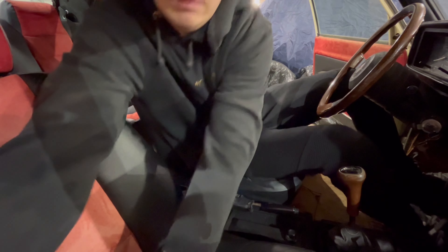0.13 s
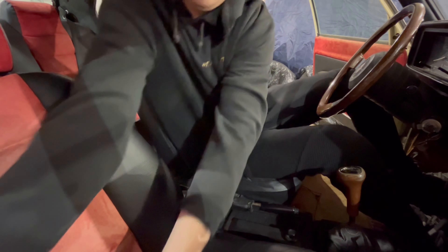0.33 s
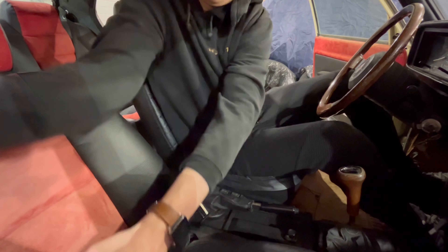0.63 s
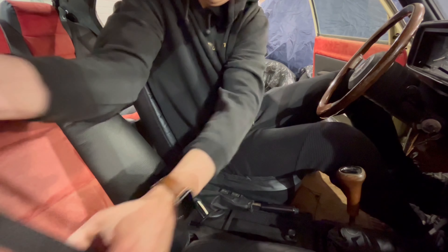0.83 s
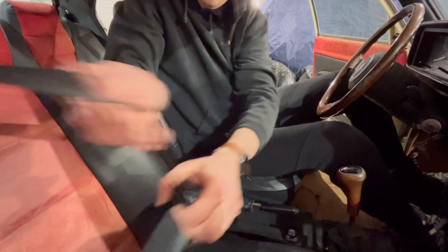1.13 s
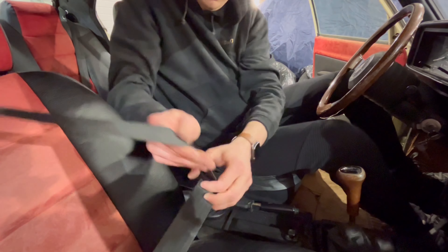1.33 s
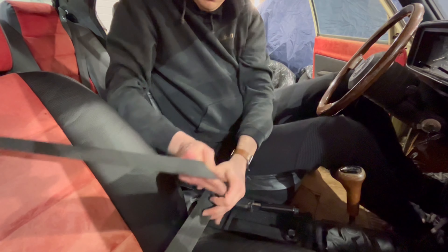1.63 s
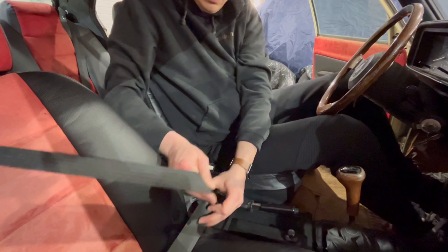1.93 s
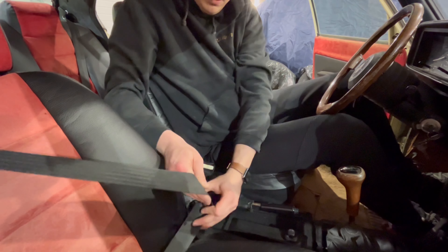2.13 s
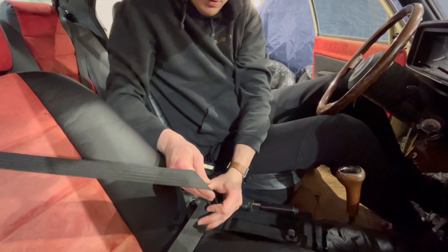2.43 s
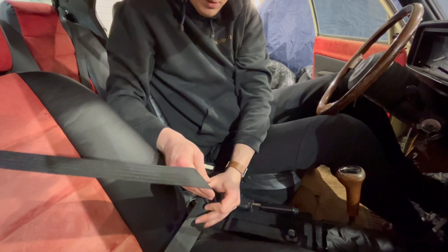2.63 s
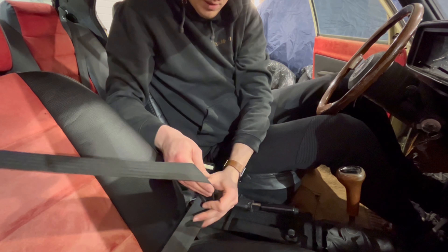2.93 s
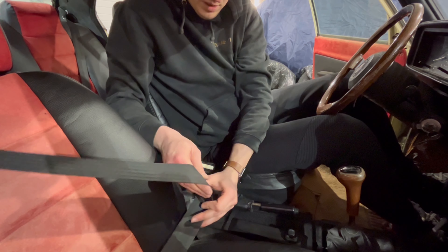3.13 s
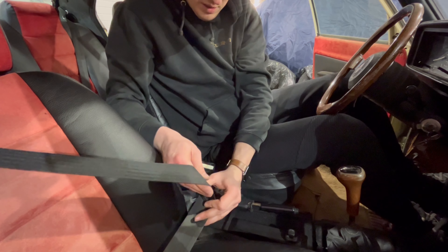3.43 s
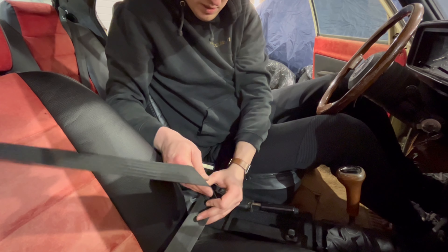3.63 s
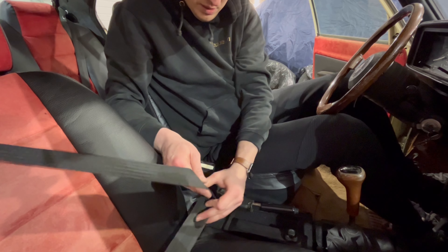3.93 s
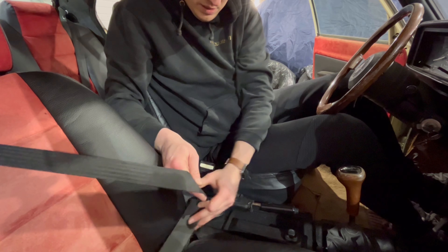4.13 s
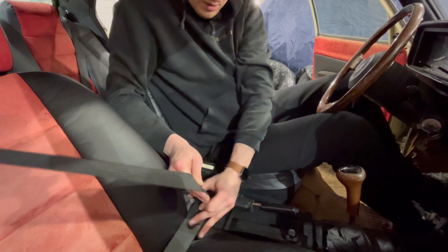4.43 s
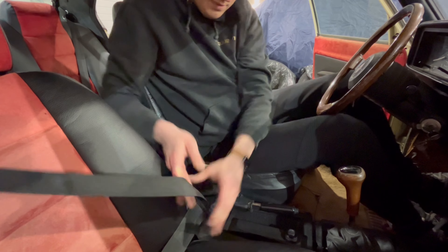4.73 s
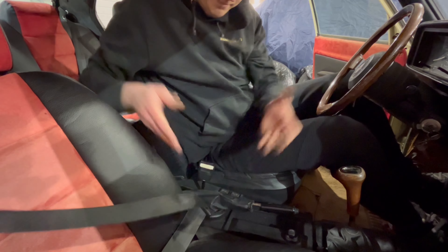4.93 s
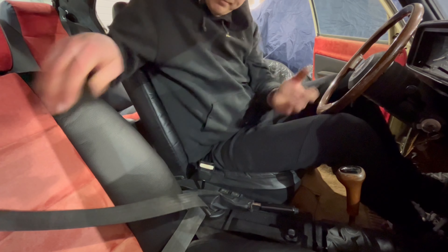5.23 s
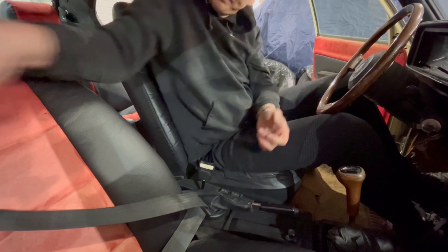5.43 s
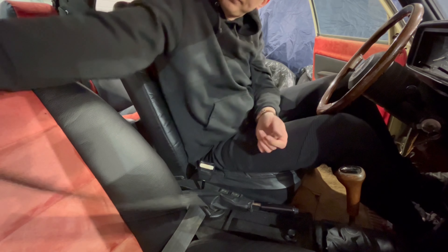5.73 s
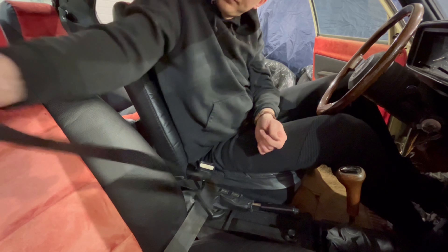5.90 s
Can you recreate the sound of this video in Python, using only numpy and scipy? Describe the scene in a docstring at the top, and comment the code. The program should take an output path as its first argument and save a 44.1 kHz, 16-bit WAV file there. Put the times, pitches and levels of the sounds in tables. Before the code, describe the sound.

A seat belt slides out with a dry fabric rasp and sleeve rustle, then stops. Hands fumble the tongue against the buckle: several isolated hard clicks, faint rattles and dull thumps, then a dense flurry and a crisp, loud snap. It goes nearly silent before webbing swishes again with small ticks. The microphone is near, in a small padded car cabin with a very short tail and faint hiss.

```python
"""A seat belt is drawn out inside a parked car: friction noise of webbing over guide and sleeve.
Hands fumble the metal tongue against the buckle, noise-burst impacts ringing decaying modes, until
the latch snaps shut. Pushes thump the seat and ring the low cabin modes; a short tail follows the clacks.
A steady hiss lies beneath. A two-port microphone sits close by, its ports differing in level and phase."""
import sys
import numpy as np
from scipy import signal
from scipy.fft import rfft, irfft
from scipy.io import wavfile
from scipy.ndimage import uniform_filter1d

SR = 44100
rng = np.random.default_rng(int(sys.argv[2]) if len(sys.argv) > 2 else 0)


def waveform_to_disk(signal):
    """Save audio, clipped to [-1, 1], as 16-bit WAV at the path in sys.argv[1]."""
    frames = np.transpose(np.atleast_2d(signal))
    scaled = np.clip(frames, -1, 1) * 32767
    samples = np.round(scaled).astype(np.int16)
    wavfile.write(sys.argv[1], SR, samples)


N = 267510

# The belt drawn out, then let go again, one curve each: (time [s], level of the sliding webbing [dB])
SLIDE = [
    [(0.0, -50.5), (0.52, -48), (0.65, -52), (0.9, -40), (0.97, -42.5), (1.125, -37), (1.21, -45.5),
     (1.45, -44.5), (1.606, -38.5), (1.625, -49), (1.69, -57.5), (1.82, -77.5)],
    [(5.49, -65.5), (5.515, -48), (5.57, -56), (5.73, -67.5), (5.765, -56), (5.835, -40.5), (5.885, -38),
     (5.93, -54.5), (6.035, -62.5), (6.043, -39.5), (6.07, -30)],
]
# The tongue knocking on buckle and trim: (time [s], rattle length [s], nominal peak [dB],
# crack [dB], crack brightness [dB per octave], hollow knock [dB], favoured ring [Hz], left-right [dB])
CLACKS = [ (1.02, .004, -36, 5.5, -1, 3, 1700, 6), (1.603, 0.0052, -31, 0, 4.5, 4, 1700, 5.5),
          (1.629, 0.0062, -27.5, 9, -0.5, 14, 2100, 5.5), (1.926, 0.0072, -25, 3, -3.5, -23, 1090, 4.5),
          (1.953, 0.00826, -32.5, -5, -4.5, 22, 953, 2), (2.036, 0.0143, -40.5, -4.5, 1, 12, 1070, -4.5),
          (2.059, 0.01036, -17.5, 2.5, 0, 9.5, 1500, 4), (2.166, 0.00714, -35.5, -0.5, 0, 13, 1600, 3),
          (2.428, 0.0288, -43.5, -9.5, -0.5, 10, 1150, 0.5),
          (2.477, 0.00548, -14.5, -3, -1.32, -0.5, 1400, 2), (2.573, 0.0134, -45.5, -6, 13, -13, 1320, 1.5),
          (2.679, 0.00617, -37.5, -6, -16, 12, 1150, 1), (2.929, 0.00828, -15, -3, 3, -4.5, 1200, 1.5),
          (3.44, 0.0099, -33, -3.5, -2.15, 3.5, 1680, 3), (3.644, 0.00706, -32, -7, 2.5, 12.5, 950, 1),
          (3.917, 0.0117, -34, -8.5, -1, 7.5, 1580, -2.5), (3.961, 0.0036, -22.5, -0.5, -2.5, -6, 1780, 4),
          (3.971, 0.0146, -37, 2, -6, 5.5, 1680, 11.5), (4.07, 0.0105, -34, 1, -8, -2, 1640, 0),
          (4.121, 0.0069, -32.5, -3, 3.5, -3, 1650, -0.5), (4.138, 0.00583, -29.5, -1, -1, 14.5, 1660, 8),
          (4.155, .006, -32, 1, 7.5, -12, 1490, -6), (4.205, 0.0093, -40.5, 6.5, 8, -2.5, 1210, 7.5),
          (4.256, 0.0064, -15, -5.5, 7.5, 8.5, 1000, -1.5), (4.265, 0.01, -20, -3.5, 0, 2, 1044, 13.5),
          (4.274, .008, -24.5, 11.5, -0.5, 0.5, 932, -4), (4.352, .006, -9, 12, 8, -23, 1500, 0),
          (4.356, .005, -8, 2, 1, -26.5, 1160, 0), (4.482, 0.0124, -40, 2.5, 5.5, 11.5, 929, 6),
          (4.558, 0.0059, -46, 0, 6.5, 18, 1560, 1), (4.854, 0.0078, -46, 0.5, 4, 12.5, 1693, 2.5),
          (5.514, 0.0135, -34.5, 28.5, -1.5, -14, 2000, 4.5),
          (5.593, 0.0045, -46, -17, -2, -15.5, 993, -4.5), (5.617, 0.0064, -45, 19.5, 4.5, -5, 1340, 4),
          (5.639, 0.0111, -44.5, 20, -2, -5, 2000, 4.5), (5.75, 0.0079, -34, 21.5, 0, 11.5, 2000, 4.5),
          (5.961, .007, -41, -1, 0.5, 17, 904, 5.5), (5.996, 0.00284, -35.5, 3, -4, 26.5, 1800, 5.5),
          (6.043, 0.00614, -21.5, 7, -2, -10, 1300, 7.5)]
# Left-right balance of the rubbing sounds: (frequency [Hz], level difference [dB])
PORTS = [(60, -9.5), (130, -1), (290, 2), (640, 2.5), (1410, 2.5), (3100, 5.5), (6820, 5.5), (15000, -5)]


def gain_of(db):
    """Level is logarithmic: 20 dB is a factor of ten in amplitude."""
    return 10 ** (np.asarray(db) / 20)


def evened(x):
    """Normalizes the root-mean-square amplitude to 1."""
    return x / np.sqrt(np.mean(x ** 2) + 1e-20)


def read(points, at):
    """Interpolates a table of frequency and value on a log-frequency axis."""
    f, value = np.transpose(points)
    return np.interp(np.log(at + 1), np.log(f + 1), value)


def add(mix, s, sound):
    """Superposition: adds a sound to the mix from time s on."""
    part = mix[..., round(s * SR):][..., :sound.shape[-1]]
    part += sound[..., :part.shape[-1]]


def controls(*tables):
    """Envelope: level in dB along curve tables, near silence outside them, lightly smoothed."""
    t, level_db = np.arange(N) / SR, np.full(N, -120.)
    for rows in tables:
        s, db = np.transpose(rows)
        inside = (t >= s[0]) & (t < s[-1])
        level_db[inside] = np.interp(t[inside], s, db)
    return uniform_filter1d(level_db, size=200)


def noise(colour_db, balance, lead_s, patchy_db, flicker_db):
    """Partly coherent two-port noise of rms 1 from random short spectra; the shared part leads on the left."""
    # Coherence of the ports: (frequency [Hz], left-right likeness [0 to 1, clipped])
    likeness = [(60, 1), (150, 0.54), (400, .5), (1500, .45), (6000, 0.1), (14000, 0.073)]
    edge_hz = 15100
    frames, hz = N // 128 + 5, np.fft.rfftfreq(512, 1 / SR)[:, None]
    a, b, c, d, patches = rng.standard_normal((frames, 257, 5)).T
    # patches of level in time and frequency, and a flicker of the whole band
    patches = uniform_filter1d(uniform_filter1d(patches, size=6, axis=0), size=14, axis=1)
    flicker = evened(uniform_filter1d(rng.standard_normal(frames), size=3))
    unevenness = gain_of(patchy_db * evened(patches) + flicker_db * flicker)
    shape = gain_of(colour_db(hz, np.minimum(np.arange(frames) * 128, N - 1)))
    shape /= np.sqrt((shape ** 2).mean(0))  # the colour has power 1 in every frame
    coherence = np.clip(read(likeness, hz), 0, 1) * np.exp(-2j * np.pi * hz * lead_s)
    left = a + 1j * b
    right = coherence * left + np.sqrt(1 - abs(coherence) ** 2) * (c + 1j * d)
    half_db = read(balance, hz) / 2
    spectra = np.array([left * gain_of(half_db), right / gain_of(half_db)])
    spectra *= shape * unevenness * (hz < edge_hz)
    return evened(signal.istft(spectra, nperseg=512, noverlap=384)[1][:, :N])


def ring(modes, t, weight_db, phase, stretch=1):
    """Free vibration: a sum of exponentially decaying sinusoids, one for each mode."""
    hz, db, t60 = np.transpose(modes)[:, :, None]
    decay = gain_of(db + weight_db[:, None] - 60 * t / (t60 * stretch))
    return (decay * np.sin(2 * np.pi * hz * t + phase[:, None])).sum(0)


def webbing():
    """Stick-slip friction: woven fibres catch and release in a grainy, flickering hiss."""
    # Spectrum of the sliding weave: (frequency [Hz], relative density [dB per Hz])
    weave = [(760, -9.5), (1300, -4), (1950, -0.5), (2420, -7), (3940, -5.5), (5550, -10), (6220, -10),
             (7120, -15), (8670, -16), (10600, -20.5), (12900, -15.5), (14600, -29.5), (15500, -18)]
    tilt_db, dulling = 1.7055, 0.056  # brightness per octave at -50 dB of sliding; lost for each dB more
    slide_db = controls(*SLIDE)
    swell_db = np.maximum(slide_db + 50, -25)

    def colour(hz, at):
        return read(weave, hz) + np.log2((hz + 100) / 3000) * (tilt_db - dulling * swell_db[at])

    bunches = evened(uniform_filter1d(rng.standard_normal(N), size=60))
    grain = evened(gain_of(1.5 * bunches))  # fibres catch in bunches
    return gain_of(slide_db) * grain * noise(colour, PORTS, lead_s=.00045, patchy_db=1.55, flicker_db=0.4)


def sleeve():
    """Cloth friction: a band of noise follows the sliding belt, and brushes on the seat shift its centre."""
    # Sleeve brushing and bumping the seat: (middle [s], peak level [dB], centre [Hz],
    # time from the middle to fall 12 dB [s, sign has no effect])
    brush_rows = [(0.032, -46.5, 500, -0.008), (0.076, -46.5, 600, -0.0116), (0.143, -43.5, 600, -0.0131),
                  (0.25, -52.5, 716, -0.0029), (0.302, -46.5, 515, 0.0247), (0.375, -45, 1150, .06),
                  (0.5, -53, 914, 0.3), (1.005, -38.5, 455, 0.025), (5.759, -42, 615, -0.0162),
                  (5.877, -56, 480, -0.0139), (5.974, -44, 390, 0.0066), (6.056, -29, 438, 0.01)]
    below_belt_db, drag_hz, follow = -2, 589, 0.7  # follow: share of the belt's swell above -50 dB
    t, slide_db = np.arange(N) / SR, controls(*SLIDE)
    drag = gain_of(slide_db + below_belt_db - (1 - follow) * (slide_db + 50).clip(0))
    brushes = [gain_of(db - 12 * ((t - s) / half) ** 2) for s, db, _, half in brush_rows]
    level = drag + sum(brushes)
    # the centre is the level-weighted mean of drag and brushes
    centre = (drag * drag_hz + sum(b * row[2] for b, row in zip(brushes, brush_rows))) / level

    def colour(hz, at):
        return -8.0 * np.log2((hz + 20) / (centre[at] + 20)) ** 2

    return level * noise(colour, PORTS, lead_s=.0004, patchy_db=1.5, flicker_db=1.2)


def seat():
    """Modal excitation: random pushes and single thumps ring the low modes, nearly alike at both ports."""
    # Body weight moving in the seat: (time [s], level [dB])
    sway_curve = [(0.0, -51), (0.42, -60), (0.7, -59.5), (0.9, -48.5), (1.3, -56), (1.62, -48),
                  (1.9, -64.5), (2.15, -42), (2.3, -57.5), (2.97, -57.5), (3.45, -72), (4.11, -54.5),
                  (4.33, -39.5), (4.6, -51), (4.85, -65.5), (5.55, -71), (5.69, -50), (5.77, -58),
                  (6.07, -44)]
    # Cabin modes: (frequency [Hz], level [dB], 60 dB decay time before damping [s])
    modes = [(49.3, -15.5, .5), (71.2, 0.5, 0.25), (87.64, 0.5, 0.42), (126.7, 0, 0.19), (149.15, 2, 0.22),
             (174.64, 1.5, 0.18), (207.7, -0.5, 0.32), (247.7, -4.5, 0.37), (290, -18, 0.054)]
    # Pushes on seat and strap: (time [s], peak before the port balance [dB], centre [Hz])
    thumps = [(0.653, -33.5, 140.6), (0.988, -35.5, 270), (1.52, -33, 88), (1.575, -35, 86),
              (1.66, -41, 88), (1.963, -28.5, 145.2), (2.065, -32, 187), (2.477, -39, 271),
              (2.691, -39, 181), (2.948, -32.5, 104.8), (3.442, -49, 147), (3.65, -44.5, 138.5),
              (3.824, -37, 133.5), (3.97, -41, 114.4), (4.127, -36.5, 119.6), (4.263, -20.5, 131.9),
              (4.292, -30.5, 125), (4.36, -34, 223), (4.487, -36, 127), (4.797, -46, 85), (4.846, -44, 110),
              (5.506, -51, 140.5), (5.582, -35.5, 75), (5.645, -43.5, 85), (5.758, -41.5, 218),
              (5.85, -31.5, 140), (5.899, -32, 182.3), (6.046, -44, 290)]
    upper_db, tug_db = -11.5, -4.5  # upper modes: under the sway, under the sliding belt
    damped = 0.626  # a pressing body shortens the cabin's ring
    t, hz = np.arange(SR // 2) / SR, np.transpose(modes)[0]
    sway = gain_of(controls(sway_curve))
    upper = gain_of(upper_db) * sway + gain_of(tug_db + controls(*SLIDE))
    push, other = rng.standard_normal((2, N))
    pushes = np.array([push - .25 * other, push + 0.41 * other])
    out = np.zeros((2, N))
    for gain, group in ((sway, modes[:3]), (upper, modes[3:])):
        still = np.zeros(len(group))
        body = ring(group, t, still, still, stretch=0.67)
        out += gain * evened(signal.oaconvolve(pushes, body[None], axes=1)[:, :N])
    phases = rng.uniform(0.09, 1.0, (len(thumps), len(hz)))
    for (s, db, centre_hz), phase in zip(thumps, phases):
        weight_db = -14.0 * np.log2(hz / centre_hz) ** 2  # a push favours the modes near its own pitch
        # the phase between the ports grows with frequency
        thump = np.array([ring(modes, t, weight_db, phase + turn * hz / 250, damped) for turn in (.6, -.6)])
        thump *= 1 - np.exp(-t / 0.0078)  # soft onset
        add(out, s, gain_of(db) * thump / abs(thump).max() * gain_of([[-1.1], [1.1]]))
    return out


def hiss():
    """Stationary coloured noise with a fluctuating level: bands near 100 Hz and 1 kHz, the latter on the left."""
    # Spectrum of the steady hiss: (frequency [Hz], relative density [dB per Hz])
    spectrum = [(15, -34.5), (25, -11), (75, -3), (113, -5.5), (144, -4), (313, -29.5), (703, -10.5),
                (762, -8), (871, -24), (970, -3), (1200, -6), (2010, -18), (2420, -29.5), (12800, -44),
                (15500, -42.5)]
    # Its left-right balance: (frequency [Hz], level difference [dB])
    side = [(60, -5.5), (150, -6.5), (380, -12), (950, 9.5), (2380, 15), (5980, -2.5), (15000, -8)]
    level_db = -62
    steady = noise(lambda hz, at: read(spectrum, hz), side, lead_s=0.00063, patchy_db=-2.0, flicker_db=3.05)
    return gain_of(level_db) * steady


def buckle():
    """Impact excitation: each clack is a rattle of tiny blows, a broad crack plus ringing housing and tongue."""
    # Modes, the first six the housing: (frequency [Hz], level [dB],
    # 60 dB decay time [s], before the housing is shortened and detuning rescales time)
    modes = [(340, -10, .05), (420, -8, .04), (490, -5, .05), (545, -3, .05), (640, -7, .035),
             (770, -8, .035), (955, -3, .045), (1080, -3, .035), (1155, 0, .045), (1300, -7, .035),
             (1478, -5, .055), (1592, -4, .045), (1690, -6, .035), (2075, -8, .03), (3150, -6, .02),
             (3270, -5, .04), (3680, -13, .03), (4085, -11, .03), (4920, -16, .03), (11900, -12, .012)]
    # Spectrum of the crack: (frequency [Hz], relative density [dB per Hz])
    crack_shape = [(880, -30), (1500, 2.5), (2740, -8), (3170, -4.5), (5350, -10), (5780, -10.5),
                   (7110, -16), (12100, -23), (15000, -26.5), (15800, -39)]
    # How far the left port leads: (frequency [Hz], phase [rad])
    facing = [(0, 1.5), (520, -0.0268), (1380, 8), (3700, 8), (4740, 16.5), (5170, 18.5), (5430, 21.5),
              (6120, 27.5), (6980, 30.5), (7580, 25.5), (9300, 30.5), (9990, 28), (10600, 34), (16000, 28)]
    rise, crest_db = 0.51, 5.5  # onset time as a share of rattle length; allowance of peak over short-time level
    # random spread from clack to clack: level of the high modes [dB], relative pitch of high modes and housing
    spread_db, metal_detune, knock_detune = 3, .01, .08
    tongue_db, hardness = -3.5, 0.58  # the tongue's high modes at a -15 dB blow; dB gained for each dB harder
    t, hz = np.arange(8192) / SR, np.transpose(modes)[0]
    bins, out = np.fft.rfftfreq(8192, 1 / SR), np.zeros((2, N))
    high = hz > 2500
    lag = np.array([bins ** 0, np.exp(-1j * read(facing, bins))])
    small = bins ** 2 / (bins ** 2 + 600 ** 2)  # small parts radiate little bass
    draws = rng.standard_normal((len(CLACKS), 4, 8192))
    for row, draw in zip(CLACKS, draws):
        s, length, db, crack_db, bright_db, hollow_db, ring_hz, pan_db = row
        u = t / max(length, .002)
        rattle = draw[:2] * gain_of(2.6 * draw[2]) * (1 - np.exp(-u / rise)) * np.exp(-1.6 * u ** 2)
        rattle[1] = .85 * rattle[0] + .45 * rattle[1]  # the ports hear mostly the same impacts

        weight_db = hollow_db * (hz < 850) + (crack_db + tongue_db + hardness * (db + 15)) * high
        weight_db += np.where(high, spread_db, 2) * draw[3, :len(hz)].clip(-2, 1)
        # the spot that is struck picks its modes
        weight_db -= 7.0 * np.minimum(abs(np.log2(hz / ring_hz)), .6) * (hz < 2500)

        phases = 3.3 * draw[3, -len(hz):]  # each housing mode starts in its own phase
        knock_t = t * (1 + knock_detune * draw[3, 200:206, None].clip(-1.5, 1.5))
        hollow = ring(modes[:6], knock_t, weight_db[:6], phases[:6], stretch=.7)
        hollow *= 1 - np.exp(-t / .007)  # the housing answers late
        metal_t = t * (1 + metal_detune * draw[3, 100].clip(-1, 1) * high[6:, None])
        metal = ring(modes[6:], metal_t, weight_db[6:], 0 * hz[6:])
        body = rfft(hollow) + rfft(metal) * small
        body /= np.sqrt(np.mean(abs(body) ** 2))
        crack = evened(gain_of(read(crack_shape, bins) + bright_db * np.log2(bins / 4000 + 0.046)))

        blows = rfft(rattle)
        # the rattle's spectrum is evened out, so the modes and crack set the colour
        blows /= np.sqrt(uniform_filter1d(abs(blows) ** 2, size=50))
        clack = irfft(blows * lag * (body + gain_of(crack_db) * crack))[:, :7000]
        loudest = np.sqrt(uniform_filter1d((clack ** 2).mean(0), size=130).max())
        add(out, s, gain_of(db - crest_db + pan_db * np.array([[.5], [-.5]])) * clack / loudest)
    return out


def cabin(x):
    """Reverberation: sparse reflections off glass and upholstery, the low end dying last."""
    taps = np.zeros((2, 16000))
    at = np.arange(150, 15900, 20) + rng.integers(0, 20, (2, 788))
    np.put_along_axis(taps, at, rng.choice([-1., 1.], at.shape), 1)
    hz, t, z = signal.stft(taps, SR, nperseg=256)
    # (frequency [Hz], 60 dB decay time [s])
    t60 = read([(300, 0.31), (1000, 0.14), (2500, 0.047), (6000, 0.084), (12000, 0.026)], hz)[:, None]
    tail = signal.istft(z * gain_of(-60 * t / np.maximum(t60, .02)), SR, nperseg=256)[1]
    return signal.fftconvolve(x, tail / np.linalg.norm(tail[0]), axes=1)[:, :N]


def hands():
    """Friction of skin and cloth: fumbling noise, and a duller strap rustle decaying after each clack."""
    # Fingers and cloth shifting round the buckle: (time [s], level [dB])
    fumble_curve = [(1.7, -73), (2.1, -55.5), (2.33, -78.5), (2.44, -64.5), (2.6, -71.5), (2.8, -77),
                    (3.25, -81.5), (3.42, -67), (3.5, -83.5), (3.6, -66), (3.9, -61.5), (4.13, -47),
                    (4.3, -49.5), (4.5, -64), (4.75, -58.5), (4.92, -63.5), (5.35, -73), (5.46, -63),
                    (5.5, -68)]
    # Spectrum of the rubbing: (frequency [Hz], relative density [dB per Hz])
    skin = [(180, -45), (300, -9), (492, -8.5), (756, 0), (892, -21), (1110, 4), (1750, -3), (1970, -5),
            (10100, -15.5), (12700, -17), (15500, -23.5)]
    settle_db, settle_db_per_s, settle_tilt_db = -36.5, 94, -3  # re clack level; decay; tilt per octave
    t = np.arange(N) / SR
    fumble = gain_of(controls(fumble_curve))
    settle = np.zeros(N)
    for s, _, db, *_ in CLACKS:
        settle += gain_of(db + settle_db - settle_db_per_s * (t - s).clip(0)) * (t > s)
    tilt_db = settle_tilt_db * settle / (fumble + settle)  # fumbling alone has no tilt

    def colour(hz, at):
        return read(skin, hz) + np.log2((hz + 100) / 3000) * tilt_db[at]

    return (fumble + settle) * noise(colour, PORTS, lead_s=.0001, patchy_db=1.5, flicker_db=1.0)


def scene():
    """Superposition of all sources, with the cabin's tail on the clacks."""
    clacks = buckle()
    tail = gain_of(-9.0) * cabin(clacks)
    return webbing() + sleeve() + seat() + hiss() + clacks + tail + hands()


def record(dry):
    """Band limiting: the microphone loses the deepest bass, then a steep filter ends the treble."""
    edge_hz = 16300
    thin = signal.sosfilt(signal.butter(N=4, Wn=45.0, btype="high", fs=SR, output="sos"), dry)
    lowpass = signal.firwin(511, edge_hz, window=("kaiser", 9), fs=SR)
    return signal.oaconvolve(thin, lowpass[None], "same")


dry = scene()
out = record(dry)
waveform_to_disk(out)
```